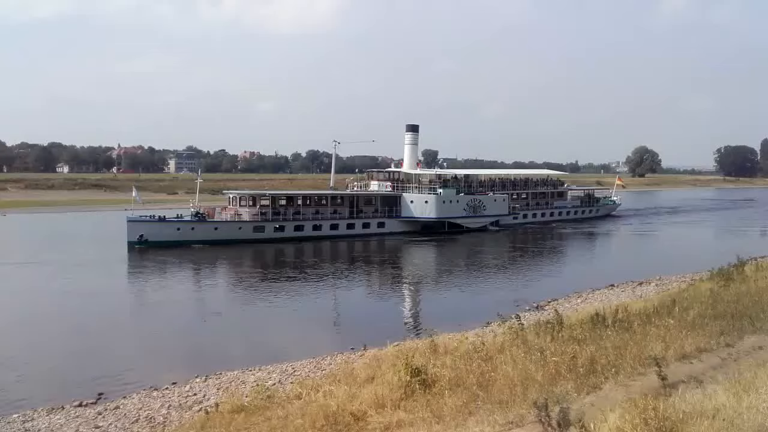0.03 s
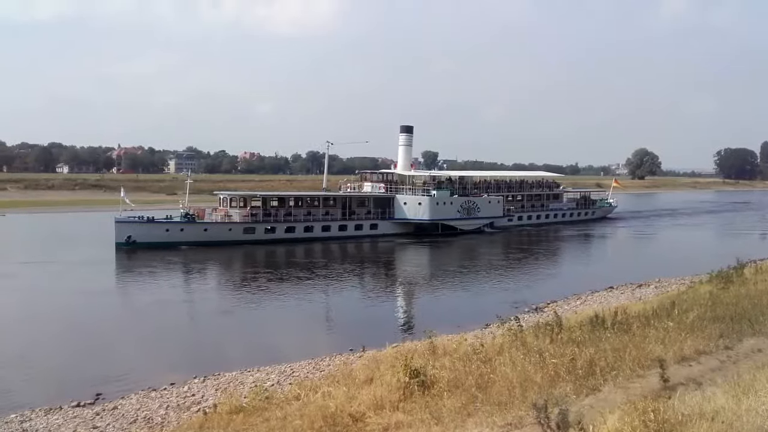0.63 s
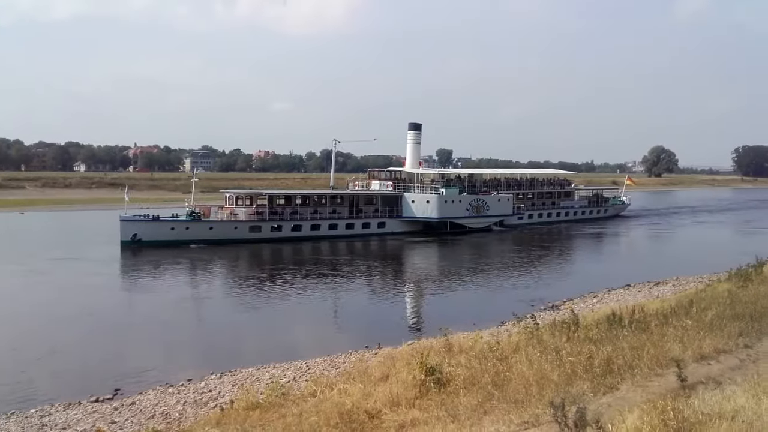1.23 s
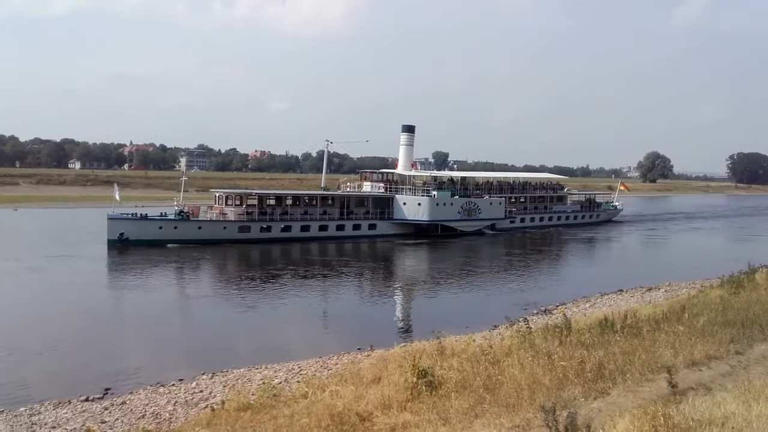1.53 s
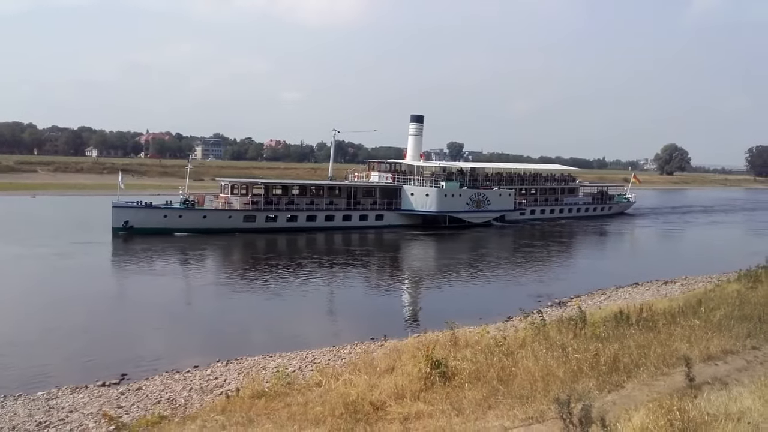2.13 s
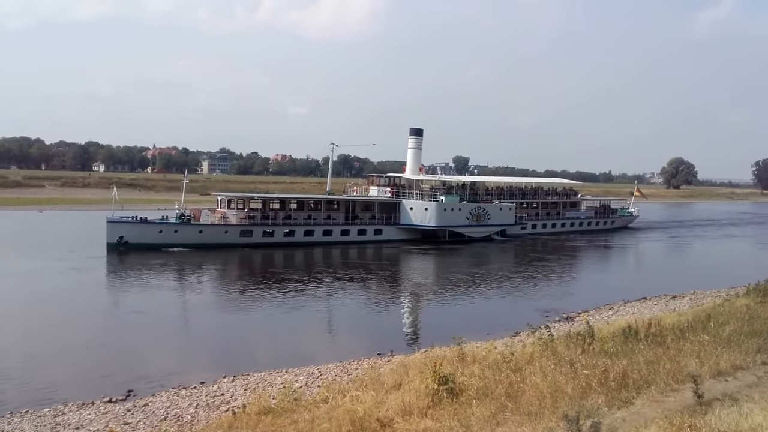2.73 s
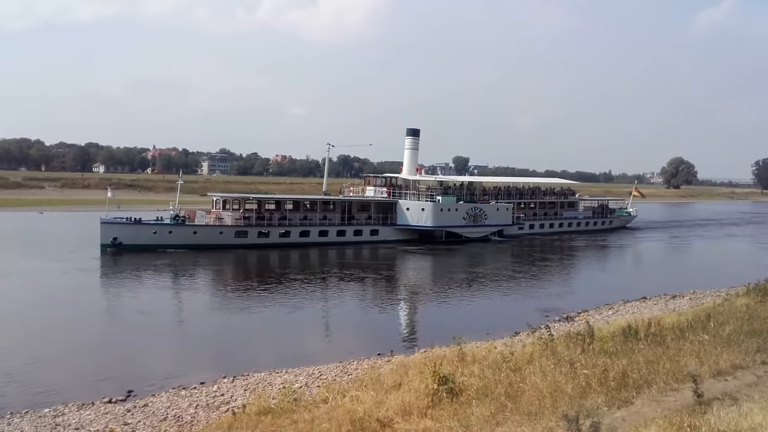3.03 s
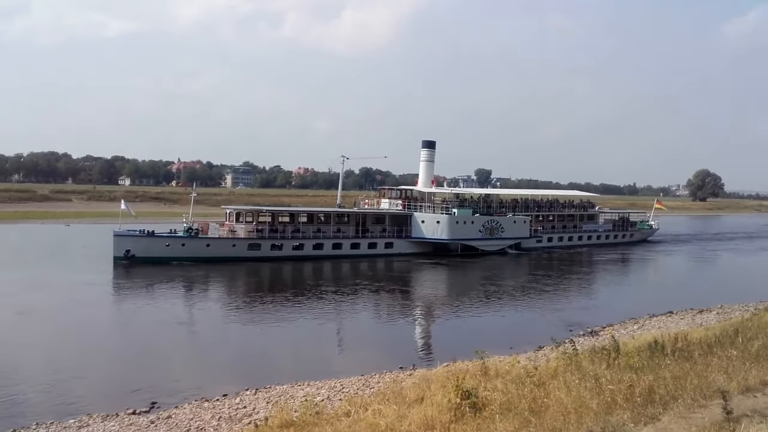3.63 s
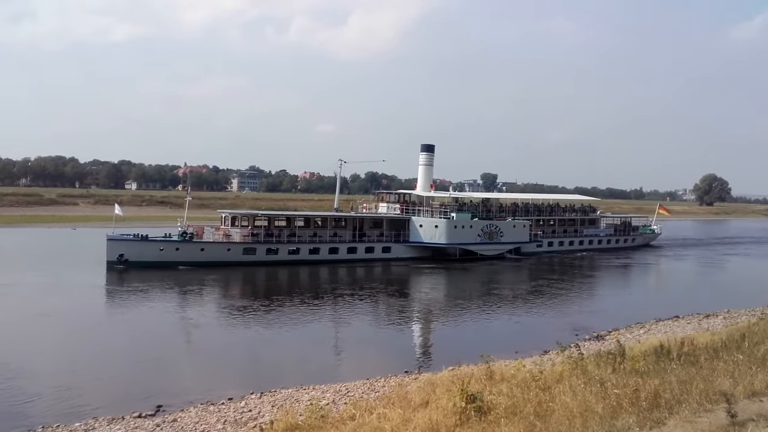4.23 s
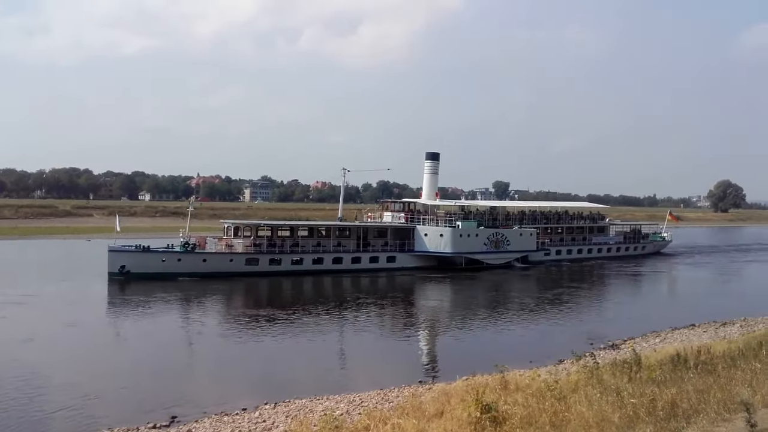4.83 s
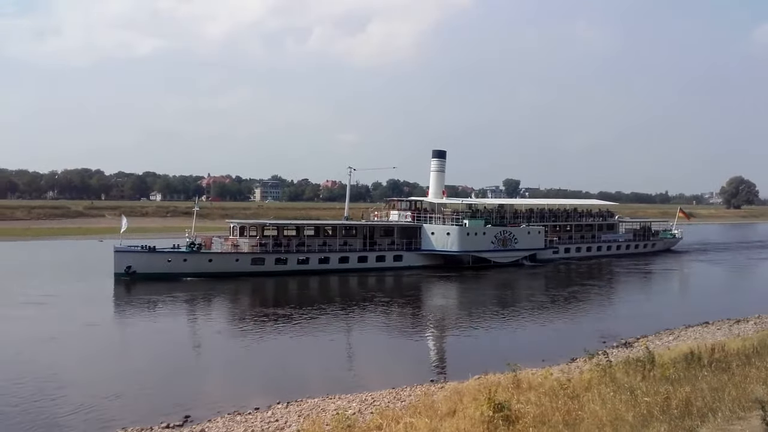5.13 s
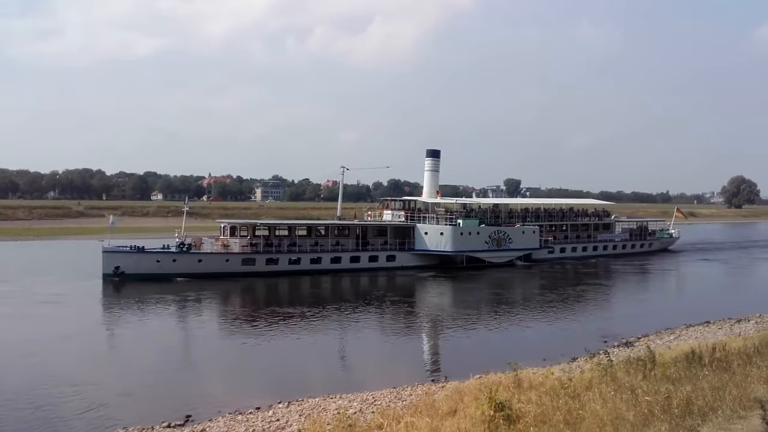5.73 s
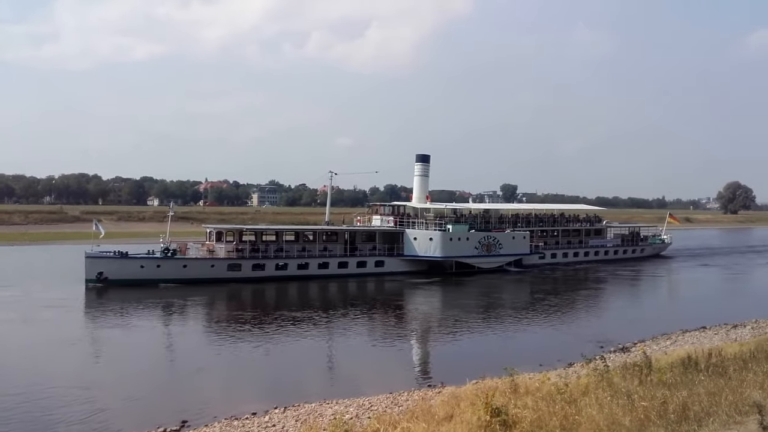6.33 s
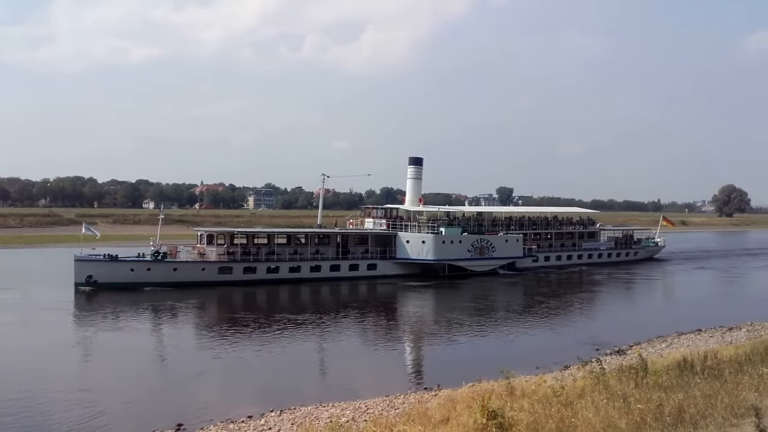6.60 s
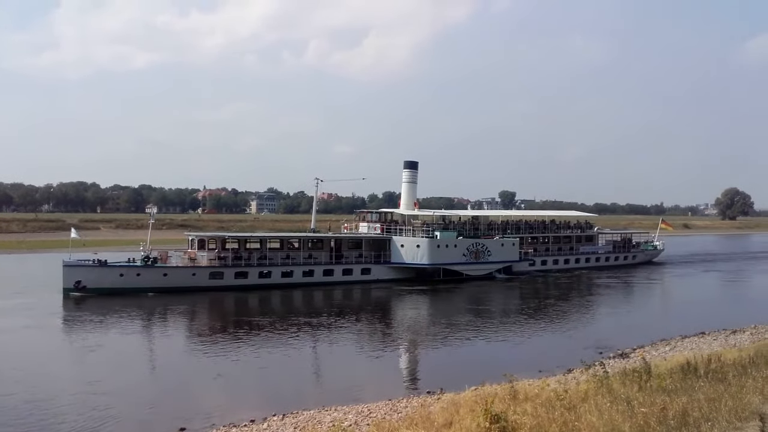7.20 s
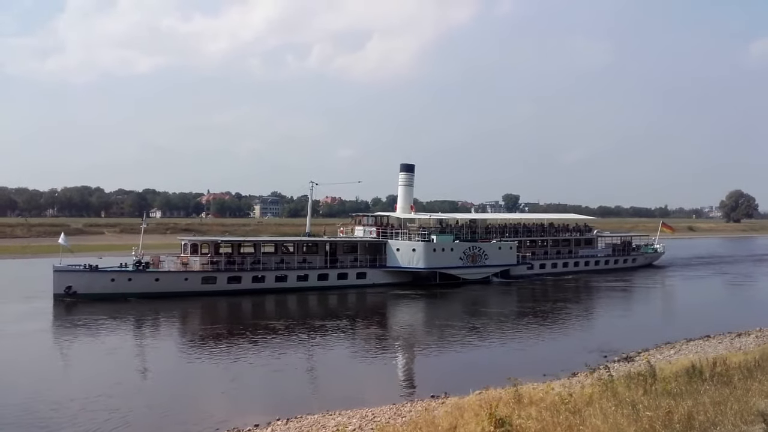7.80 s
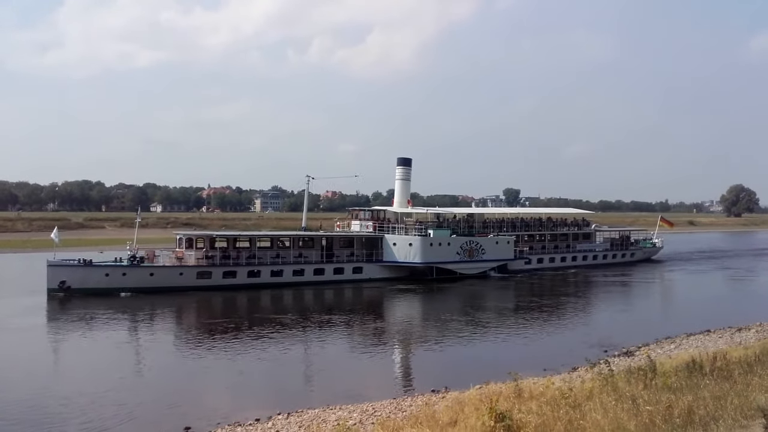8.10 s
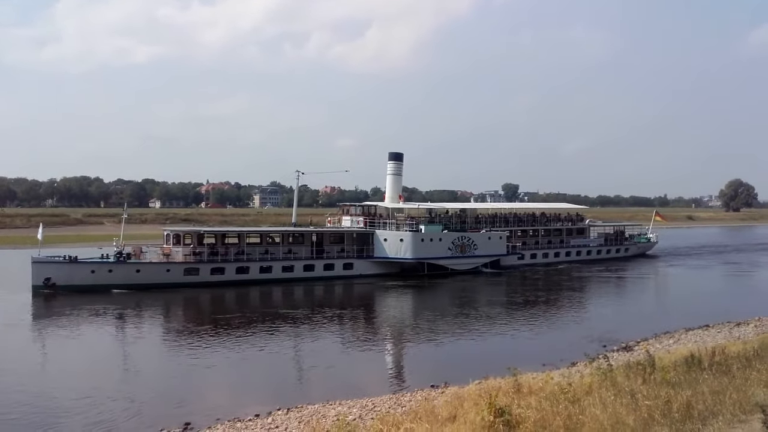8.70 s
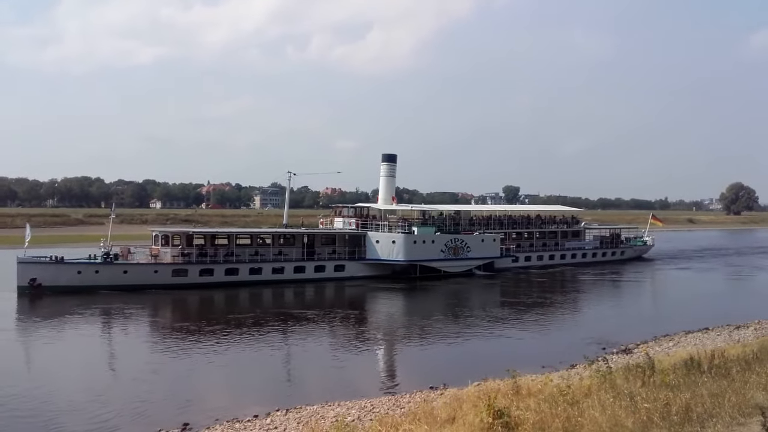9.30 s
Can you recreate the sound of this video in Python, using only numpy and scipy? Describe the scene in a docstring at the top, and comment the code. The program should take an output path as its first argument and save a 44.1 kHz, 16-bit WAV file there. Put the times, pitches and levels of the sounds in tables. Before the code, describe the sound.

After a brief silence, the sound of a paddle steamer on a river fades in at about 0.5 seconds, heard from the bank. The wheel slaps the water evenly, four times a second, over a soft, hollow churning wash with hissing spray and a very faint high shimmer. A breeze hits the microphone in short low thumps, strongest from 0.8 to 1.3 seconds and continuing until about 2.4. A faint dry tick sounds close by at 0.9 seconds. At 2.8 seconds one sharp, loud click strikes the microphone. The wash sinks until nearly 4 seconds, with another cluster of wind thumps around 3.5, then recovers by about 5.5. A second faint tick comes at 5.4 seconds. The paddle beat and wash continue steadily to the end at around 9.5 seconds, with lighter wind puffs near 7, 8 and 9 seconds.

```python
"""A paddle steamer passes on a river, heard from the bank. Its floats (the boards on the wheel) slap
the water four times a second over a steady churning wash and spray. A faint high shimmer is heard too.
A breeze swirls against the microphone in short low thumps. Two faint ticks sound close by, and one
sharp click hits the microphone. The sound fades in after a moment of silence."""
import sys
import numpy as np
from scipy import signal
from scipy.fft import rfft, irfft, next_fast_len
from scipy.io import wavfile
from scipy.ndimage import uniform_filter1d, map_coordinates

SR = 44100
rng = np.random.default_rng(int(sys.argv[2]) if len(sys.argv) > 2 else 0)


def output_pcm(signal):
    """Save a mono or channel-first signal as 16-bit PCM at the path in sys.argv[1].

    Samples are clipped to [-1, 1] before scaling.
    """
    pcm = np.clip(np.atleast_2d(signal).T, -1, 1) * 32767
    wavfile.write(sys.argv[1], SR, np.round(pcm).astype(np.int16))


N = 421155


def amp(db):
    """Turn decibels (dB) into a number to multiply a sound by."""
    return 10 ** (np.asarray(db) / 20)


def unit(x):
    """Scale a signal so that its average power is 1."""
    return x / np.sqrt(np.mean(x ** 2) + 1e-20)


def clock():
    """The time of every sample, in seconds."""
    return np.arange(N) / SR


def wobble(rate):
    """A smooth curve through `rate` random values a second."""
    return map_coordinates(rng.standard_normal(int(N * rate / SR) + 4), [clock() * rate])


def filtered(x, response):
    """Multiply each frequency in x by the gain that `response` gives for it."""
    size = next_fast_len(N + SR // 2)
    return irfft(rfft(x, size) * response(np.fft.rfftfreq(size, 1 / SR)), size)[:N]


def coloured(x, spectrum):
    """Shape the tone of x along (Hz, dB) points, then scale it to power 1."""
    points_hz, db = np.transpose(spectrum)
    return unit(filtered(x, lambda hz: amp(np.interp(np.log(hz + 1), np.log(points_hz), db))))


def patchy(depth_db, frames):
    """Noise whose narrow bands swell and sink on their own; more frames make that slower."""
    bands = signal.stft(rng.standard_normal(N), nperseg=512)[2]
    swell = uniform_filter1d(rng.standard_normal(bands.shape), size=3, axis=0)
    for size in (frames, frames // 2):
        swell = uniform_filter1d(swell, size=size, axis=1)
    return unit(signal.istft(bands * amp(depth_db * unit(swell)), nperseg=512)[1][:N])


def impacts(rate):
    """Tiny knocks of random size at random times, about `rate` a second."""
    return unit((rng.random(N) < rate / SR) * rng.standard_normal(N))


def overall_level():
    """Overall loudness in dB; it dips after the click, then recovers."""
    # Each row: time in seconds, base level in dB.
    levels = [(0.65, -51.5), (0.77, -49), (1.19, -45.5), (2.55, -43.5), (2.84, -45.5), (3.83, -49.5),
              (4.1, -48), (4.25, -46), (5.6, -44), (6.19, -44), (7.43, -43.5), (8.19, -43), (8.31, -43.5),
              (9.5, -43.5)]
    return np.interp(clock(), *np.transpose(levels))


def paddle_beat(floats_per_s, first_s, rise_s, fall_s):
    """The pulsing power of the splashes: each float bites quickly and its water falls back more slowly."""
    power, now = np.zeros(N), clock()
    for bite_s in np.arange(first_s, N / SR + rise_s, 1 / floats_per_s):
        t = now - bite_s
        shape = np.exp(-np.where(t < 0, (t / rise_s) ** 2, t / fall_s))
        scatter_db = 0.5 * rng.standard_normal()
        power += 1.265 * amp(scatter_db) ** 2 * shape
    return power


def hollow_colour(x):
    """A few broad peaks give the water's sound a hollow colour."""
    # Each row: centre of a band in Hz, width in Hz, boost in dB.
    bands = [(647, 330, 1.8), (1400, 240, -0.46), (1910, 390, 4.5), (2453, 400, 5), (3075, 350, 5.5),
             (3560, 200, 2)]
    def boost_db(hz):
        return sum(db * np.exp(-(2 * (hz - centre) / width) ** 2) for centre, width, db in bands)
    return unit(filtered(x, lambda hz: amp(boost_db(hz))))


def wash(level_db, beat):
    """The wheel churns the water all the time, and every float adds a lumpy splash."""
    # The tone of stirred water. Each row: frequency in Hz, relative level in dB.
    tone = [(25, -40), (50, -18), (100, -10), (290, -4.5), (400, -13.5), (490, -3.5), (690, 0),
            (940, -11.5), (1400, -6), (2400, -13), (3150, -20), (3700, -23), (4300, -58), (6000, -91)]
    churn = coloured(patchy(depth_db=1.48, frames=12) * amp(0.81 * wobble(40)), tone)
    lumps = patchy(depth_db=0.5, frames=10) + .5 * impacts(rate=600)
    splash = coloured(lumps * amp(2.0 * wobble(70)), tone)
    # each slap has a hollow low note near 660 Hz
    splash = filtered(splash, lambda hz: hz / (hz + 300) * (1 + .5 / (1 + ((hz - 660) / 160) ** 2)))
    slaps = amp(level_db + 3.5) * np.sqrt(beat) * hollow_colour(splash)
    return amp(level_db + 3) * hollow_colour(churn) + slaps


def spray(change_db, beat):
    """The splashes throw up hissing spray; it follows the overall level with wider swings."""
    # The tone of the spray. Each row: frequency in Hz, relative level in dB.
    tone = [(2500, -45), (3700, -0.5), (4300, -1), (5200, 1.5), (5900, -9), (6600, -22), (7400, -31),
            (9000, -43), (16000, -47)]
    hiss = coloured(patchy(depth_db=1.4, frames=12), tone)
    return amp(-64 + 1.93 * change_db) * np.sqrt(1 + 0.47 * beat) * hiss


def shimmer(change_db, rise_db_per_s):
    """A faint high hiss whose narrow bands come and go; it follows the overall level and slowly grows."""
    # The tone of the finest hiss. Each row: frequency in Hz, relative level in dB.
    tone = [(6000, -63), (7900, -20.5), (8700, -7), (10000, -1), (11300, 3), (13000, 0.5), (13600, -3.5),
            (15700, -9)]
    level_db = -70 + 2.06 * change_db + rise_db_per_s * clock()
    return amp(level_db) * coloured(patchy(depth_db=3.2, frames=90), tone)


def wind_strength(lull_db, flutter_db, rise_s, fall_s):
    """The wind's level in dB: gusts rise, hold and die away over light, fluttering air."""
    # Gusts on the microphone. Each row: start in seconds, hold in seconds, level in dB.
    gusts = [(0.55, 0.098, -39.5), (0.834, 0.42, -32), (1.072, 0.24, -29.5), (1.323, 0.56, -38),
             (1.942, 0.4, -36.5), (2.495, 0.3, -44), (3.35, 0.53, -44), (3.545, 0.17, -37.5),
             (4.096, 0.025, -42.5), (5.05, 0.38, -48), (5.61, 0.017, -45), (6.28, 0.07, -50),
             (6.61, 0.25, -47), (7.146, 0.055, -43), (7.9, 0.13, -47), (8.373, 0.18, -43.5),
             (8.966, 0.36, -42)]
    t = clock()
    power = amp(lull_db + flutter_db * wobble(11)) ** 2
    for start, hold, db in gusts:
        early, late = np.maximum(start - t, 0), np.maximum(t - start - hold, 0)
        power += amp(db) ** 2 * np.exp(-(early / rise_s) ** 2 - (late / fall_s) ** 2)
    return 10 * np.log10(power)


def eddy(t, hz, sharpness):
    """One passing swirl of air: it sucks, then pushes, with a steep change between."""
    swirl = (1 - 2j * np.pi * hz * t / sharpness) ** -(sharpness + 1)
    return np.imag(swirl * np.exp(-1j * rng.uniform(0, 0.9)))


def breeze(bass_cut_hz):
    """Wind hits the microphone as a lumpy rumble, and single strong swirls stand out as thumps."""
    # The tone of the rumble. Each row: frequency in Hz, relative level in dB.
    tone = [(20, -9), (40, -27), (65, -2), (100, 4.5), (170, 3.5), (300, -4), (450, -18), (800, -24),
            (2000, -41), (5000, -100)]
    # The strongest swirls. Each row: time in seconds, base level in dB, pitch in Hz before it is lowered.
    eddies = [(0.557, -20, 217), (0.832, -14.5, 240), (0.983, -13.5, 270), (1.101, -10.5, 260),
              (1.142, -13, 304), (1.153, -13.5, 230), (1.163, -7.5, 274), (1.192, -4.5, 533),
              (1.262, -18, 284), (1.272, -10.5, 282), (1.686, -18, 228), (1.926, -14.5, 197),
              (2.032, -21.5, 198), (2.159, -18.5, 230), (2.347, -18, 240), (2.772, -23, 168),
              (2.871, -23.5, 187), (3.498, -21, 228), (3.546, -18, 270), (3.623, -19, 243),
              (3.645, -16.5, 282), (5.195, -25.5, 280), (6.295, -26.5, 202), (6.734, -23.5, 190),
              (7.173, -25, 149), (7.193, -23.5, 165), (7.981, -21, 242), (8.954, -26, 210),
              (9.128, -23, 210), (9.323, -20, 222)]
    wind_db = wind_strength(lull_db=-53, flutter_db=3.9, rise_s=0.022, fall_s=0.034)
    swirls = (impacts(rate=330) + .5 * rng.standard_normal(N)) * amp(2.24 * wobble(45))
    out = amp(wind_db) * coloured(swirls, tone)
    # stronger gusts break into smaller, higher swirls
    ragged = unit(filtered(swirls, lambda hz: hz ** 3 * np.exp(-hz / 140)))
    out += amp(1.42 * wind_db - 3) * ragged
    t = np.arange(-SR // 50, SR // 50) / SR
    for time_s, db, hz in eddies:
        start = round(time_s * SR) - len(t) // 2
        out[start:start + len(t)] += amp(db) * eddy(t, 0.81 * hz, sharpness=4.1)
    # the microphone passes little deep bass
    return filtered(out, lambda hz: hz ** 2 / np.hypot(hz ** 2, bass_cut_hz ** 2))


def ticks(decay_s):
    """Tiny dry ticks close by: bursts of noise that drop 60 dB in decay_s."""
    # The ticks. Each row: start in seconds, peak level in dB.
    events = [(0.89, -58), (5.422, -50)]
    # Their bright tone. Each row: frequency in Hz, relative level in dB.
    tone = [(2000, -25), (5500, 7), (8000, -5), (11000, -10), (16000, -21)]
    out = np.zeros(N)
    for start, db in events:
        t = clock() - start
        decay = (t >= 0) * amp(-60 * np.abs(t) / decay_s)
        tick = coloured(decay * rng.standard_normal(N), tone)
        out += amp(db) * tick / np.max(np.abs(tick))
    return out


def click(start_s, peak_db, width_s, bass_cut_hz):
    """A sharp pressure spike on the microphone; with no deep bass it swings back below zero."""
    age = np.maximum(clock() - start_s, 0) / width_s
    spike = age ** 3 * np.exp(-age)
    spike[np.argmax(spike)] *= 1.03  # a hard tip gives it treble
    spike = filtered(spike, lambda hz: (1j * hz / (bass_cut_hz + 1j * hz)) ** 2)
    return amp(peak_db) * spike / np.max(spike)


def scene():
    """Paddle wheel, shimmer, breeze, ticks and click at one microphone."""
    level_db = overall_level()
    change_db = level_db + 44.5  # how far above or below the usual level
    beat = paddle_beat(floats_per_s=4.03, first_s=0.127, rise_s=0.038, fall_s=0.045)
    mix = wash(level_db, beat) + spray(change_db, beat) + shimmer(change_db, rise_db_per_s=0.5)
    mix += breeze(bass_cut_hz=81) + ticks(decay_s=0.0089)
    mix += click(start_s=2.841, peak_db=-1.7, width_s=0.00007, bass_cut_hz=148)
    return mix[None]


def record(dry):
    """Fade in quickly after a short silence, and cut off the very highest treble."""
    silence_s, fade_s, top_hz = 0.413, 0.24, 15750
    fade = np.clip((clock() - silence_s) / fade_s, 0, 1) ** 0.95
    return filtered(dry[0] * fade, lambda hz: hz < top_hz)[None]


dry = scene()
out = record(dry)
output_pcm(out)
```